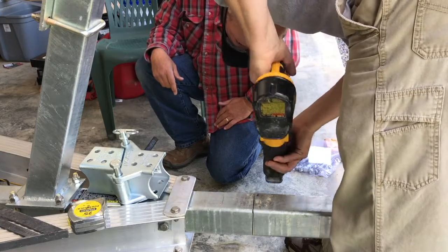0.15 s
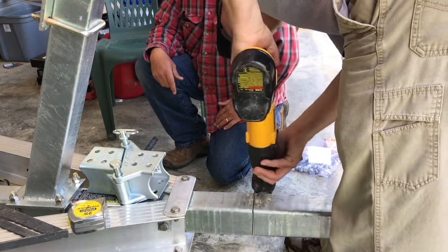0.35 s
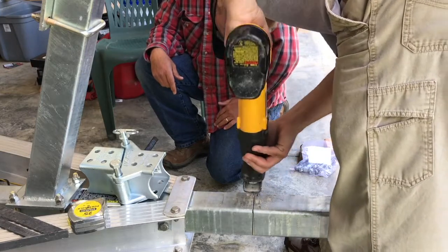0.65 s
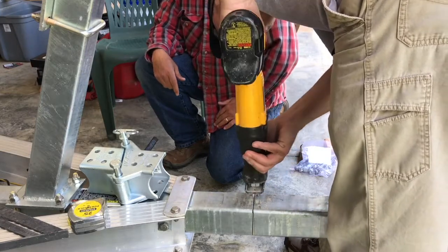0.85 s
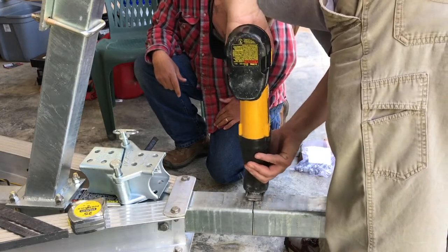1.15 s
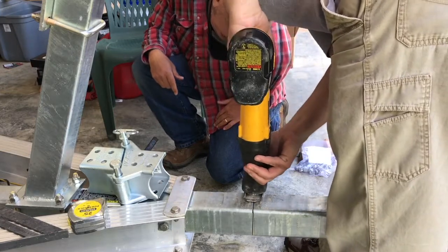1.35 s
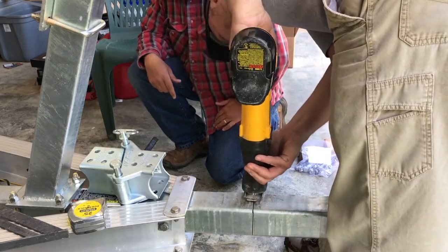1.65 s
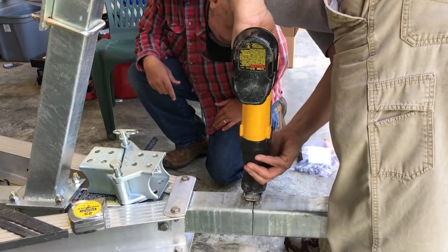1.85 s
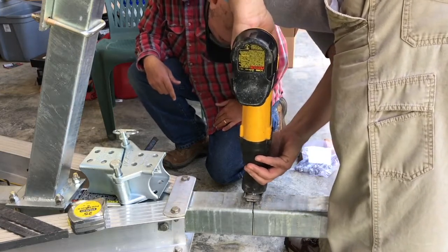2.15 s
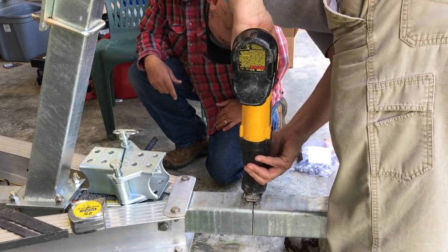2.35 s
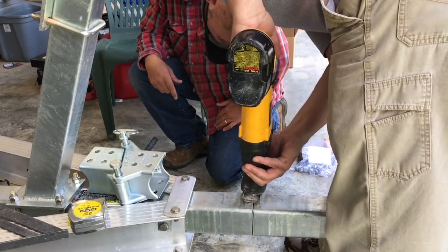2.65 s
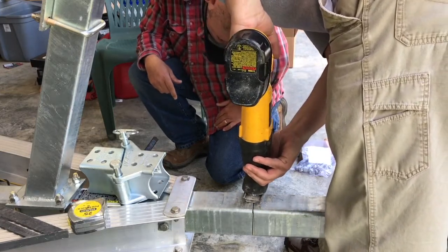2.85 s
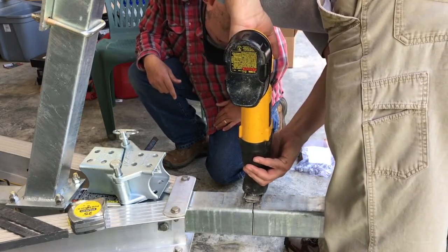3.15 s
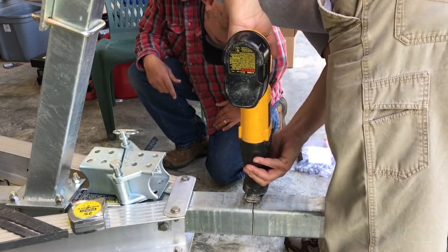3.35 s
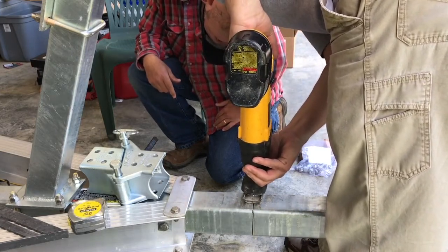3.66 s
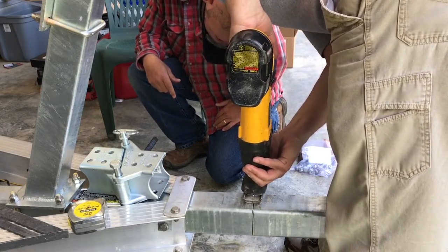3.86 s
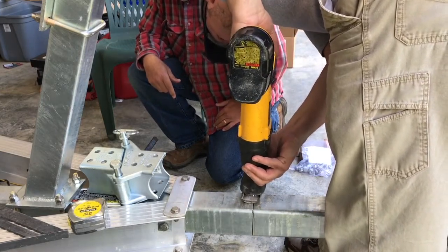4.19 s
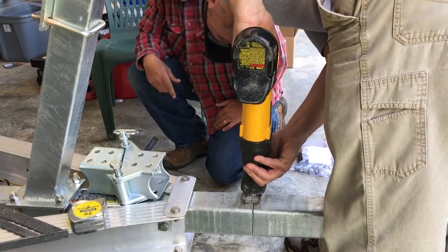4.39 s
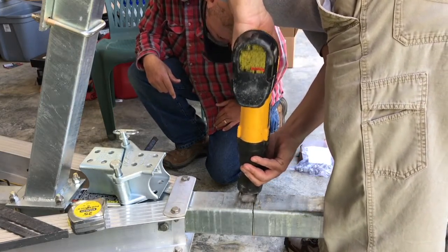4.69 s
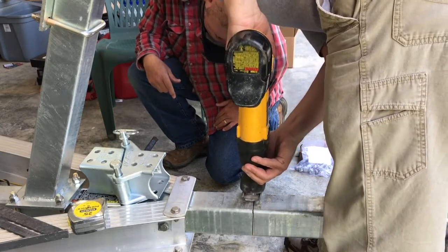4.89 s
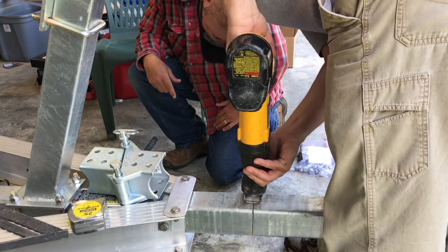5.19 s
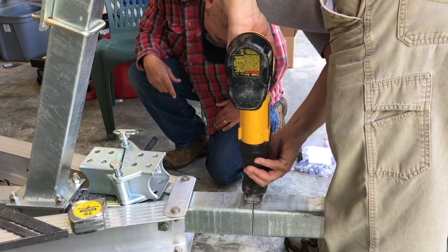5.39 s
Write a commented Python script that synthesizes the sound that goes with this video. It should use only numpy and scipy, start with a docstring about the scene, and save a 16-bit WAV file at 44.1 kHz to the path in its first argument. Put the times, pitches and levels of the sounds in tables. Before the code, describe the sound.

A saw shoe clanks onto steel tube, faint taps and birdsong follow, then a one-second harsh metal cut roars and coasts down with ringing.

```python
"""Throughout, a far bird chips (falling sines) and outdoor air rumbles and hisses with puffs of wind (noise).
A reciprocating saw's shoe lands on a galvanized steel tube at a garage mouth; shoe and blade knock, click and
slide (grain bursts into resonators). A nearer bird whistles and buzzes (gliding sines). The drive whines (sine),
the teeth catch and cut at full speed (grains and jolts paced by a crank), then the saw coasts to a stop."""
import sys
import numpy as np
from scipy import signal
from scipy.fft import rfft, irfft
from scipy.io import wavfile

SR = 44100
rng = np.random.default_rng(int(sys.argv[2]) if len(sys.argv) > 2 else 0)


def file_out(sig):
    """Save sig as 16-bit WAV at sys.argv[1]."""
    # one column per channel
    cols = np.atleast_2d(sig).T
    # limit, then scale
    lim = np.clip(cols, -1, 1)
    pcm = np.round(lim * 32767).astype(np.int16)
    wavfile.write(sys.argv[1], SR, pcm)


N = 243869
TIME = np.arange(N) / SR
PULL_S, RELEASE_S = 3.938, 5.0453  # trigger pulled, let go

# bright hiss of teeth and small contacts: f/Hz, relative level/dB
HISS_SPECTRUM = [(3000, -26.5), (5000, -0.5), (6500, 1), (9000, -4), (10400, -6.5), (11500, -2),
                 (13500, -7.5), (16000, -7)]


def from_db(db):
    """Decibels to gain."""
    return 10 ** (np.asarray(db) / 20)


def rms_one(x):
    """Scale to an rms of one."""
    return x / np.sqrt(np.mean(x ** 2) + 1e-20)


def in_time(rows):
    """Each column of a curve, at every sample."""
    s, *columns = np.transpose(rows)
    return [np.interp(TIME, s, c) for c in columns]


def during(start, end, fade=0.027):
    """One between two times, with linear edges."""
    fade_in = np.clip((TIME - start) / fade, 0, 1)
    fade_out = np.clip((end - TIME) / fade, 0, 1)
    return fade_in * fade_out


def drift(rate):
    """Random curve with an rms of one and `rate` knots per second."""
    knots = rng.standard_normal(4000)
    return rms_one(np.interp(TIME * rate, np.arange(len(knots)), knots))


def tone(hz, level):
    """A sine that follows a pitch and a level."""
    return level * np.sin(2 * np.pi * np.cumsum(hz) / SR)


def colour(x, spectrum):
    """Causal (minimum-phase) filter that keeps the power of white noise."""
    size = 4096
    hz, db = np.transpose(spectrum)
    bin_hz = np.arange(size // 2 + 1) * SR / size
    gain = rms_one(from_db(np.interp(np.log(bin_hz + 1), np.log(hz), db)))
    # fold the cepstrum onto positive times for minimum phase
    cepstrum = irfft(np.log(gain))
    cepstrum[1:size // 2] *= 2
    cepstrum[size // 2 + 1:] = 0
    impulse = irfft(np.exp(rfft(cepstrum)))
    return signal.oaconvolve(x, impulse)[:N]


def grains(per_s, spread_db):
    """Random tiny impacts of uneven size; rms one."""
    struck = rng.random(N) < per_s / SR
    sign = rng.choice([-1, 1], N)
    size = from_db(spread_db * rng.standard_normal(N))
    return rms_one(struck * sign * size)


def chatter(times, levels_db, t60, rise_s=.0012):
    """Each contact is a burst of tiny rebounds that builds up quickly and dies away."""
    hits = np.zeros(N)
    hits[np.round(times * SR).astype(int)] = from_db(levels_db)
    force = signal.lfilter([1], [1, -from_db(-60 / (t60 * SR))], hits + 1e-18)
    keep = np.exp(-1 / (rise_s * SR))
    envelope = signal.lfilter([1 - keep], [1, -keep], force)
    return envelope * grains(per_s=14000, spread_db=-0.5)


def steel(x, ring_db, wander_db=0):
    """The broad sound plus the resonances it sets ringing; a moving contact feeds them unevenly."""
    # modes of tube and blade: f/Hz, width/Hz, relative level/dB
    steel_modes = [(1030, 30, -1), (1320, 20, 2), (1397, 25, 3), (1489, 16, 7), (1630, 260, -1),
                   (1742, 20, 7), (2173, 14, 7), (2268, 20, 7), (2361, 14, 7), (2521, 18, 7),
                   (2727, 20, 12), (2800, 220, -3), (2950, 30, 7), (3588, 24, 4), (4010, 70, 2),
                   (4504, 30, 7), (5475, 18, 13), (5785, 16, 5), (7344, 18, 9), (8810, 100, 2),
                   (11080, 130, 6), (11950, 120, 1), (14650, 60, 1)]
    out = x.copy()
    for hz, width_hz, db in steel_modes:
        r = np.exp(-np.pi * width_hz / SR)
        poles = [1, -2 * r * np.cos(2 * np.pi * hz / SR), r * r]
        zeros = np.array([1, 0, -1]) * (1 - r * r) / 2
        drive = x * from_db(db + ring_db + wander_db * drift(30))
        out += signal.lfilter(zeros, poles, drive + 1e-18)
    return out


def cutting():
    """Teeth rake the tube in swells paced by the crank, which jolts saw and frame twice a turn."""
    # how hard the saw is leant on, easing once in mid-cut: t/s, relative level/dB
    feed_curve = [(4.06, -3.5), (4.19, 2), (4.37, -9.5), (4.49, 1.5), (4.72, -1), (4.94, -1.5),
                  (5.04, -4.5)]
    # toothed scrape: f/Hz, relative level/dB
    rasp_spectrum = [(400, -17.5), (700, -8), (1000, -5.5), (1450, -2.5), (2000, -2), (2800, -3),
                     (4200, -4.5), (5200, -10.5), (8000, -41.5)]
    # shaken frame: f/Hz, relative level/dB
    shake_spectrum = [(20, -28.5), (38, -3.5), (80, 1.5), (130, 5), (190, 0.5), (260, 7.5), (400, -2.5),
                      (650, -1.5), (1000, -23.5)]
    catch_s, full_strokes_per_s = 4.055, 42
    rasp_db, hiss_db, hiss_feed_power = -21.5, -23, 1.5
    teeth_speed_power, lift_db_per_s = 1.57, 124
    shake_db, shake_speed_power, shake_feed_power = -34.5, 1.54, 0.67
    # drops while the teeth only skim the zinc, before they catch
    skim_rasp_db, skim_hiss_db, skim_shake_db = -5, -10.5, -18.5
    frame_share_db = -2

    speed, feed_db = crank_speed(), in_time(feed_curve)[0]
    skimming = np.clip((catch_s - TIME) / .02, 0, 1)
    lift_db = -lift_db_per_s * np.maximum(TIME - RELEASE_S, 0)  # blade lifts off
    teeth = speed ** teeth_speed_power * from_db(lift_db)
    shaking_db = shake_db + shake_feed_power * feed_db + skim_shake_db * skimming
    shaking = speed ** shake_speed_power * from_db(shaking_db)

    turns = np.cumsum(full_strokes_per_s * speed * (1 + .04 * drift(25))) / SR
    angle = 2 * np.pi * turns
    # the scrape swells twice a turn, together with the jolts, every other swell stronger
    bite_db = .5 * np.cos(2 * angle) + 0.38 * np.cos(angle) + 1.62 * drift(240)
    bite = rms_one(from_db(bite_db))
    rasp_level = teeth * from_db(rasp_db + feed_db + skim_rasp_db * skimming)
    rasp = rasp_level * colour(bite * grains(per_s=16000, spread_db=1.0), rasp_spectrum)
    hiss_level = teeth * from_db(hiss_db + hiss_feed_power * feed_db + skim_hiss_db * skimming)
    hiss = hiss_level * colour(bite * grains(per_s=20000, spread_db=3.5), HISS_SPECTRUM)

    half_turns = np.diff(np.floor(2 * turns), prepend=0) * np.sqrt(SR / (2 * full_strokes_per_s))
    jolts = half_turns * (np.cos(angle) + .5 + 1.22 * rng.standard_normal(N))
    rumble = 0.95 * bite * rng.standard_normal(N)
    shake = shaking * colour(0.5 * jolts + rumble, shake_spectrum)
    cut = steel(rasp + hiss + shake, ring_db=-5, wander_db=3.0)
    return cut + frame(from_db(frame_share_db) * shaking)


def crank_speed():
    """Share of full speed: the motor runs up while the trigger is held, then coasts."""
    spin_up_s, coast_s = .06, 0.16  # time constants
    run_up = 1 - np.exp(-np.maximum(TIME - PULL_S, 0) / spin_up_s)
    return run_up * np.exp(-np.maximum(TIME - RELEASE_S, 0) / coast_s)


def frame(shaking):
    """The frame stores the shaking level in long modes, wavering sines that ring on after the cut."""
    # long rings of the whole frame: f/Hz, relative level/dB, t60/s
    frame_modes = [(146, -14, 1.6), (1335, -23, 1.8)]
    out = np.zeros(N)
    for hz, db, t60 in frame_modes:
        keep = from_db(-60 / (t60 * SR))
        swing = signal.lfilter([1 - keep], [1, -keep], shaking)
        out += from_db(db) * swing * np.sin(2 * np.pi * hz * TIME + 0.32 * drift(24))
    return out


def landing():
    """The shoe comes down on the tube with a hard clank and bounces."""
    # contacts of the shoe: t/s, relative level/dB
    shoe_hits = [(0.4185, -9), (0.426, -22.5), (0.561, -31), (0.6585, -45)]
    # shoe on steel: f/Hz, relative level/dB
    shoe_spectrum = [(100, -29), (310, -8.5), (600, -13.5), (1000, -14), (1700, -10.5), (2250, -3),
                     (2700, -3), (3300, -8.5), (4300, -12.5), (7000, -22.5), (16000, -28.5)]
    s, hit_db = np.transpose(shoe_hits)
    return steel(colour(chatter(s, hit_db - 8, t60=0.091), shoe_spectrum), ring_db=-2)


def knocks():
    """The blade taps the tube: clank, ringing bright edge, thud of the saw's body; two dull bumps add thuds."""
    # blade taps: t/s, relative level/dB, treble relative to the tap/dB
    taps = [(0.563, -32, -18.5), (0.9, -39.5, -25), (1.1478, -33.5, -12.5), (1.1983, -31.5, -9),
            (1.2212, -38, 5.5), (1.2295, -18.5, -8), (1.5808, -51, -2), (1.6027, -60, 1), (1.682, -43, -22),
            (1.929, -40.5, -28), (2.603, -37, -12), (2.6248, -32.5, -0.5), (3.9902, -16.5, -30.5),
            (4.0499, -7, -7.5), (5.1747, -42, 6.5), (5.2478, -32, -9.5), (5.463, -43, -8)]
    # dull bumps of the saw's body: t/s, relative level/dB
    body_bumps = [(2.633, -49.5), (3.516, -48.5)]
    # clank: f/Hz, relative level/dB
    clank_spectrum = [(300, -24), (1000, -1), (1500, 4), (2700, -4), (4200, -5), (6000, -23.5),
                      (12000, -25)]
    # body thud: f/Hz, relative level/dB
    thud_spectrum = [(60, -7), (130, -0.5), (230, 6.5), (400, -1), (750, -1), (1500, -33)]
    s, tap_db, treble_db = np.transpose(taps)
    clank = colour(chatter(s, tap_db - 14.5, t60=0.15), clank_spectrum)
    edge = colour(chatter(s, tap_db + treble_db - 5.5, t60=0.059), HISS_SPECTRUM)
    tap_thud = chatter(s, tap_db - 29.5, t60=0.32)
    bump_thud = chatter(*np.transpose(body_bumps), t60=0.46, rise_s=0.0035)
    thud = colour(tap_thud + bump_thud, thud_spectrum)
    return steel(clank + thud, ring_db=-3.5) + steel(edge, ring_db=0.5)


def clicks():
    """Small dry contacts of trigger and crank play in the housing barely reach the tube."""
    # contacts: t/s, relative level/dB
    housing_contacts = [(3.179, -50), (3.237, -30.5), (3.263, -37), (3.3404, -30), (3.363, -25.5),
                        (3.382, -31.5)]
    # dry tick: f/Hz, relative level/dB
    tick_spectrum = [(300, -33), (1100, -12), (1600, 0.5), (2200, -4.5), (3000, -8), (5000, -14),
                     (10000, -29)]
    s, contact_db = np.transpose(housing_contacts)
    tick = colour(chatter(s, contact_db - 4, t60=0.024), tick_spectrum)
    edge = colour(chatter(s, contact_db - 30, t60=0.037), HISS_SPECTRUM)
    return steel(tick + edge, ring_db=-9)


def sliding():
    """Shoe and teeth catch and skip on the zinc as pressure builds and fades; each slide ends the last."""
    # light slides: t of firmest pressure/s, relative level/dB, fade/(dB/s), hiss relative to scrape/dB
    slides = [(0.595, -46.5, 178, -28), (0.688, -47, 166, -25), (3.257, -55.5, 21, -33),
              (3.526, -54.5, 247.5, -34), (3.71, -56.5, 227.5, -3)]
    # scrape: f/Hz, relative level/dB
    scrape_spectrum = [(100, -4), (400, -7), (900, -5), (1600, -3), (2600, -7.5), (4000, -16.5),
                       (7000, -23), (16000, -40)]
    rise_db_per_s = 330
    catches = from_db(1.8 * drift(90)) * grains(per_s=5000, spread_db=3.0)
    scrape, hiss = colour(catches, scrape_spectrum), colour(catches, HISS_SPECTRUM)
    ends = [row[0] for row in slides[1:]] + [PULL_S]
    out = np.zeros(N)
    for (s, db, fade, hiss_db), end in zip(slides, ends):
        drop_db = np.maximum(rise_db_per_s * (s - TIME), fade * (TIME - s))
        pressure = from_db(db - drop_db) * during(s - .045, end + 0.018)
        out += pressure * (scrape + from_db(hiss_db) * hiss)
    return steel(out, ring_db=-4.5)


def drive_whine(start_hz=11456, start_db=-72):
    """The speed control switches the motor current audibly while the trigger is half pressed."""
    glide_hz = -350 * np.clip((TIME - 3.91) / .035, 0, 1)
    pitch = start_hz + glide_hz + 12 * drift(90)
    level = from_db(start_db + 6.2 * (TIME > 3.79))
    return tone(pitch, level * during(3.22, 3.955, fade=.005))


def birds():
    """A far bird chips steadily; a nearer one whistles arches and follows the first with a buzz."""
    # arched whistles: t/s, relative level/dB, length/s, top of arch f/Hz
    whistles = [(1.747, -56.5, 0.14, 4970), (3.583, -56.5, 0.17, 4890), (3.809, -66, .045, 3650),
                (3.894, -63, 0.041, 4900)]
    first_chip_s, chip_every_s, chip_length_s = .092, .1218, .042
    chip_db, chip_hz, chip_fall_hz = -65, 3260, 500
    foot_hz, foot_db, arch_skew = 3170, -5.5, 1.8  # feet softer than top; top late in the arch

    chip = np.minimum((TIME - first_chip_s) % chip_every_s / chip_length_s, 1)
    chip_pitch = chip_hz - chip_fall_hz * chip ** 2 + 130 * drift(350)
    out = tone(chip_pitch, from_db(chip_db + 2 * drift(1.8)) * np.sin(np.pi * chip))
    for start, db, length, top_hz in whistles:
        arch = np.sin(np.pi * np.clip((TIME - start) / length, 0, 1) ** arch_skew)
        pitch = foot_hz + (top_hz - foot_hz) * arch + 90 * drift(350)
        level = from_db(db + foot_db * (1 - arch))
        out += tone(pitch, level * during(start, start + length, fade=.012))
    trill = np.sin(2 * np.pi * 78 * TIME)
    buzz_pitch = 4250 + 720 * trill + 90 * drift(400)
    return out + tone(buzz_pitch, from_db(-61.5) * during(1.947, 2.205, fade=0.057))


def outdoors():
    """Distant rumble and hiss, with small puffs of wind on the microphone."""
    # steady air: f/Hz, relative level/dB
    air_spectrum = [(20, -18), (65, 0.5), (150, -8.5), (300, -19.5), (1300, -23.5), (2200, -27.5),
                    (3000, -22.5), (3800, -33), (16000, -46.5)]
    # puffs: t of peak/s, level/dB, Gaussian width/s
    puffs = [(0.627, -54, 0.14), (1.06, -47.5, 0.014), (1.45, -56, 0.057), (2.272, -56.5, 0.054),
             (2.74, -51.5, 0.059), (3.186, -49, 0.011), (3.872, -45.5, 0.019)]
    # puff noise: f/Hz, relative level/dB
    puff_spectrum = [(20, -14), (45, 0.5), (75, 6), (130, -7), (250, -17.5), (2000, -75)]
    air = from_db(-63.5) * colour(rng.standard_normal(N), air_spectrum)
    gusts = sum(from_db(db) * np.exp(-.5 * ((TIME - s) / width) ** 2) for s, db, width in puffs)
    return air + gusts * colour(rng.standard_normal(N), puff_spectrum)


def garage(x, wet_db, t60, treble_t60, crossover_hz=4500):
    """Adds a diffuse tail from floor and walls, its treble dying first."""
    t = TIME[:SR]
    noise = rng.standard_normal(SR)
    dull = signal.sosfilt(signal.butter(1, crossover_hz, fs=SR, output="sos"), noise)
    dull_tail = dull * from_db(-60 * t / t60)
    treble_tail = (noise - dull) * from_db(-60 * t / treble_t60)
    tail = (dull_tail + treble_tail) * (t > .005)
    return x + from_db(wet_db) * signal.oaconvolve(x, tail / np.linalg.norm(tail))[:N]


def scene():
    """Saw and steel close by, birds and air from outside."""
    contacts = cutting() + landing() + knocks() + clicks() + sliding()
    work = garage(contacts, wet_db=-10, t60=0.4, treble_t60=0.13)
    calls = garage(birds(), wet_db=-1.5, t60=.35, treble_t60=0.34)
    return (work + drive_whine() + calls + outdoors())[None]


def record(dry):
    """The loudest peaks are rounded off and the top is cut steeply."""
    ceiling, cutoff_hz = .47, 15900
    rounded = dry / (1 + (dry / ceiling) ** 6) ** (1 / 6)
    lowpass = signal.ellip(12, .1, 80, cutoff_hz, fs=SR, output="sos")
    return signal.sosfilt(lowpass, rounded)


dry = scene()
out = record(dry)
file_out(out)
```